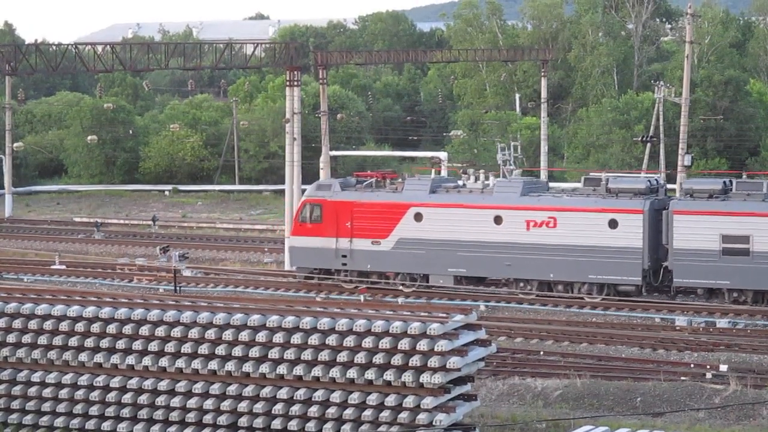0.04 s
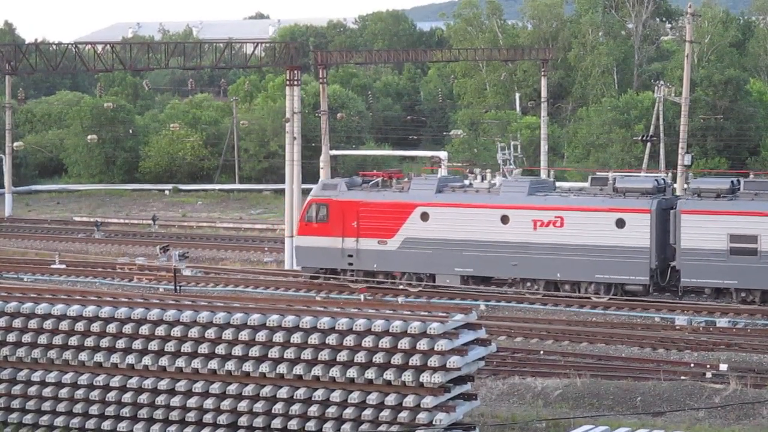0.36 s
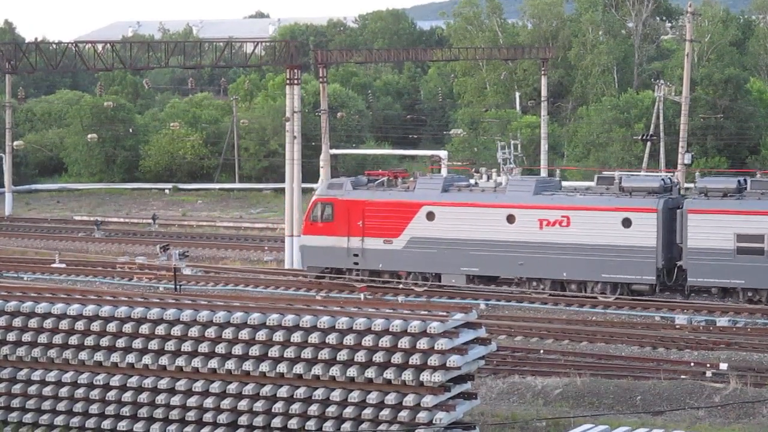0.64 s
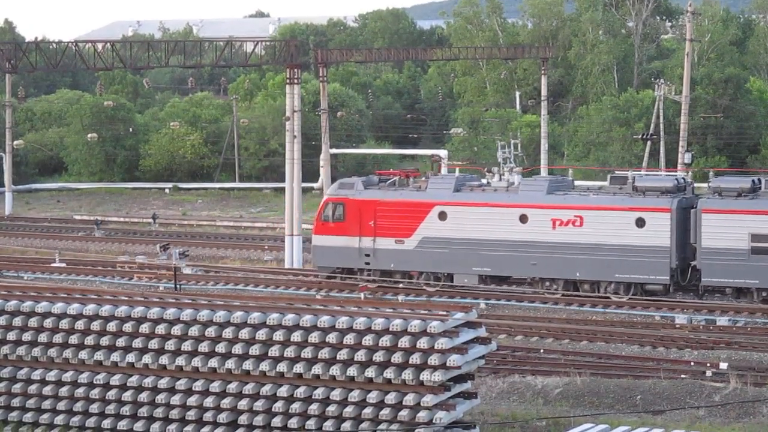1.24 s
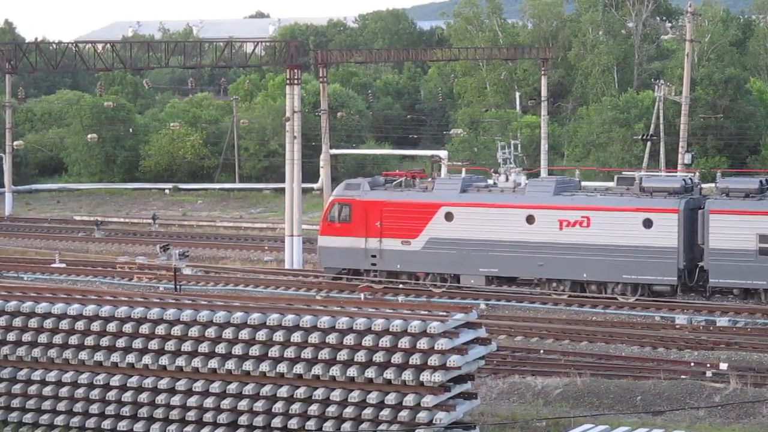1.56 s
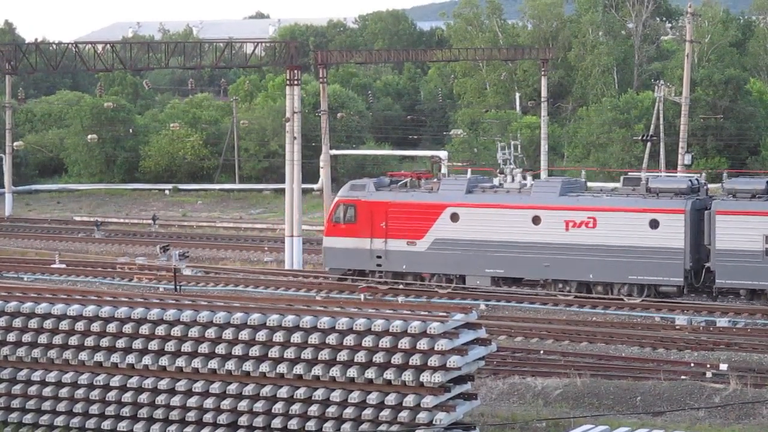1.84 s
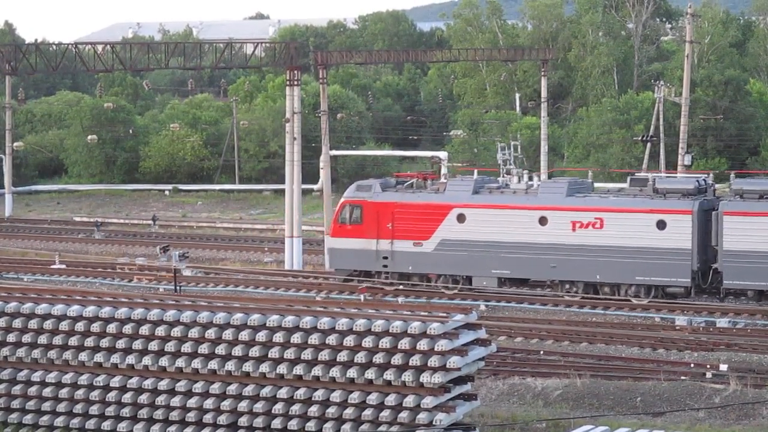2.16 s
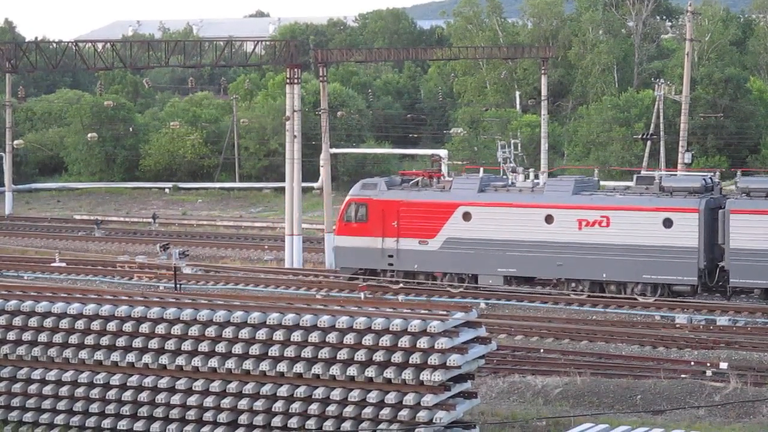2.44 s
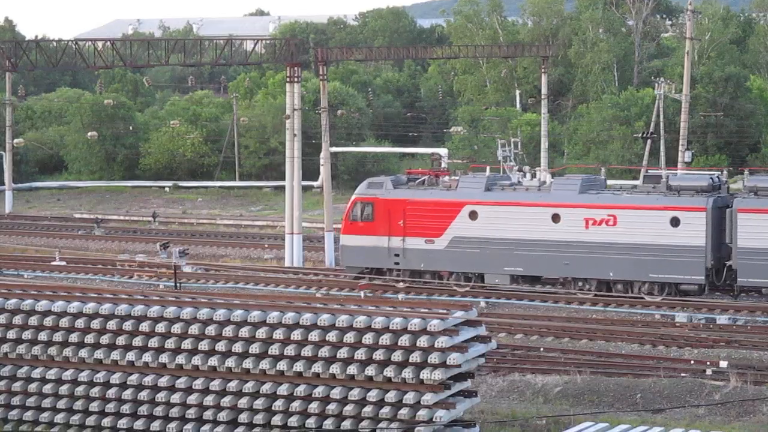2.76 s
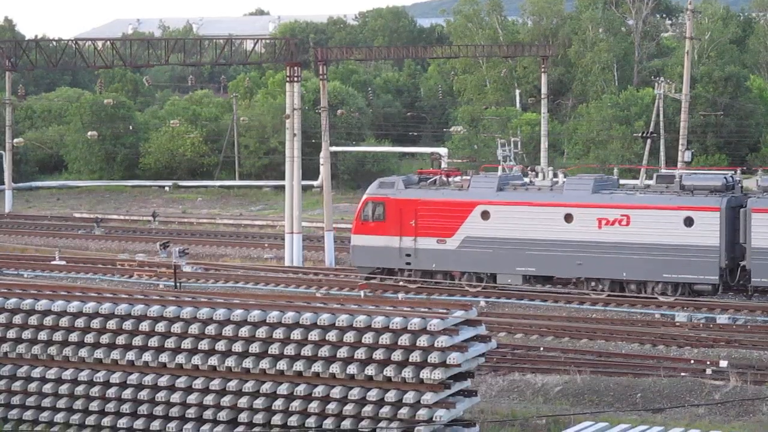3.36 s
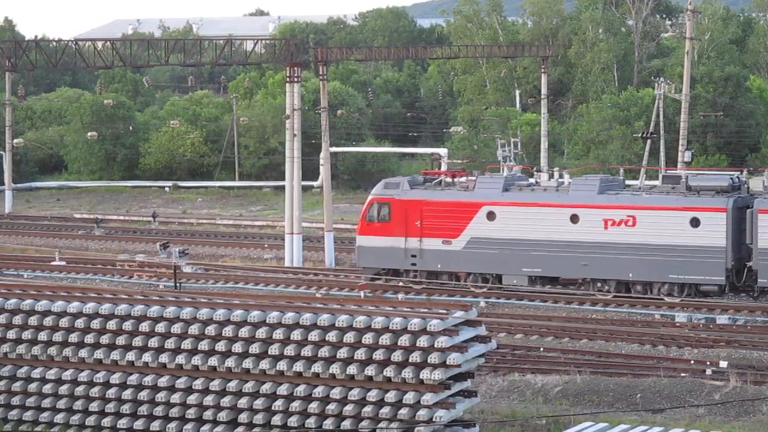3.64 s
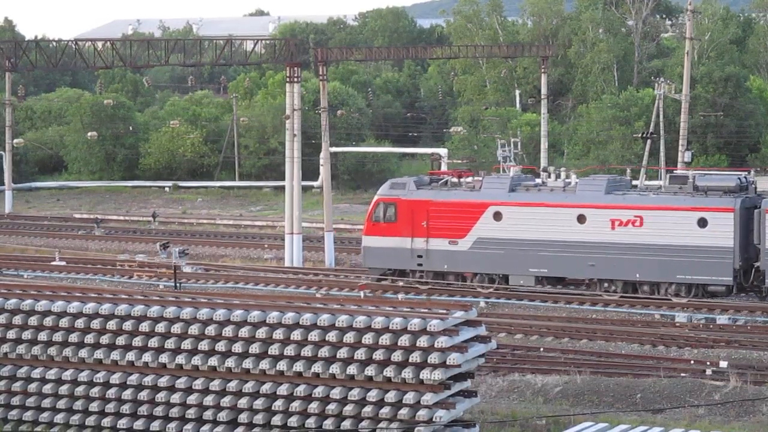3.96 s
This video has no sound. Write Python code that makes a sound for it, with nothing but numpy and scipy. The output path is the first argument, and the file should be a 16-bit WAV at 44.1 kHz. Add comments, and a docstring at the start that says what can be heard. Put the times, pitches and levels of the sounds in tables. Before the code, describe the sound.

An electric locomotive's cooling blowers whirr as it creeps through a rail yard, heard from some way off. One steady tone swells and fades over rushing air, a deep hum, faint motor whines and rumbling wheels.

```python
"""The cooling blowers of an electric locomotive creeping through a rail yard, some way off, in mono.
They sing one steady blade tone that swells and fades at the microphone as the engine moves.
Behind it the cooling air rushes and rings in the ducts, the body booms, and the motors add
a low hum and faint whines. The running gear rumbles underneath."""
import sys
import numpy as np
from scipy import signal
from scipy.fft import rfft, irfft
from scipy.io import wavfile
from scipy.ndimage import uniform_filter1d

SR = 44100
rng = np.random.default_rng(int(sys.argv[2]) if len(sys.argv) > 2 else 0)


def generate_wav(signal):
    """Clip the signal to [-1, 1] and save it as 16-bit WAV at the path in sys.argv[1]."""
    frames = np.transpose(np.atleast_2d(signal))
    scaled = np.clip(frames, -1, 1) * 32767
    pcm = np.round(scaled).astype(np.int16)
    wavfile.write(sys.argv[1], SR, pcm)


N = 176400
T = np.arange(N) / SR
HZ = np.maximum(np.arange(N // 2 + 1) * SR / N, 1)

# Rumble of the running gear: frequency_hz, density_db (per Hz)
RUMBLE_SPECTRUM = [(12, -81.5), (25, -65.5), (40, -59.5), (54, -49), (70, -48), (95, -47.5), (118, -57.5),
                   (200, -68.5), (500, -92.5)]
# Rush of the cooling air: frequency_hz, density_db (per Hz)
AIR_SPECTRUM = [(100, -61.5), (380, -56), (800, -54.5), (890, -57), (970, -55), (1130, -59.5),
                (1345, -57.5), (1510, -64.5), (2000, -64.5), (2650, -69), (3200, -71.3), (3750, -72.5),
                (4200, -74.5), (5400, -76.5), (6500, -81.5), (7200, -87.5), (8300, -90.5), (8900, -96.3),
                (11800, -101.5), (15500, -117)]
# The treble rises and falls, and steps down sharply at about 2.46 s: time_s, gain_db
TREBLE_GAIN = [(0, 1.5), (.32, 0.5), (.44, -1.2), (1, -0.2), (1.55, 2), (1.83, -1), (2.2, -.8), (2.44, .8),
               (2.48, -1.1), (2.9, 0), (3.27, 1), (3.5, 0.6), (4, 1.5)]
# Whines of motors and smaller fans: pitch_hz, start_level_db (rms), change_db_per_s
MOTOR_WHINES = [(78, -40, -1), (246, -39, 1.5), (500, -45, 2.5), (948, -41.5, -0.5), (1134, -50.5, 0.5),
                (1190, -51.5, 3), (1325, -44, -1.8), (1417, -57.5, 3.5), (1568, -58, 2)]
# Resonances of the air ducts: centre_hz, width_hz, level_db (rms)
DUCT_RESONANCES = [(156.5, 40, -30), (282, 60, -34), (489.2, 118, -26.5), (564.8, 68, -26), (700, 74, -31),
                   (751.7, 32, -36.5), (1645, 70, -48.5), (2394, 260, -46.5), (2895, 150, -51.5)]
# Deep boom of the body: time_s, level_db (rms)
BOOM_SWELLS = [(0, -23.5), (.18, -21.5), (.3, -23), (.7, -25), (.88, -22.5), (1.08, -24.5), (1.27, -18),
               (1.47, -17.5), (1.67, -22.5), (1.8, -17), (1.9, -21), (2.1, -21), (2.34, -25.5),
               (2.44, -17.5), (2.58, -22), (2.9, -17), (3.05, -19), (3.35, -18.5), (3.5, -22), (3.7, -21.5),
               (3.84, -17), (4, -19.5)]
# Blade tone at the microphone: time_s, level_db (rms)
BLADE_SWELLS = [(0, -17), (.3, -12.5), (.57, -17), (.8, -14.5), (.93, -15.5), (1.08, -19.5), (1.16, -32),
                (1.27, -35), (1.47, -19), (1.6, -18.5), (1.7, -21), (1.92, -16), (2.45, -16), (2.7, -19),
                (3.07, -20), (3.25, -27), (3.46, -22), (3.73, -20), (4, -25.5)]


def from_db(db):
    """Decibels to gain."""
    return 10 ** (np.asarray(db) / 20)


def rms_one(x):
    """Scale to an rms of one."""
    return x / np.sqrt(np.mean(x ** 2) + 1e-20)


def in_time(rows):
    """Join (time_s, value) rows by straight lines."""
    return np.interp(T, *np.transpose(rows))


def drift(rate_hz):
    """Random wander, mostly slower than `rate_hz`; rms one."""
    spectrum = rfft(rng.standard_normal(N)) / (1 + (np.fft.rfftfreq(N, 1 / SR) / rate_hz) ** 2)
    spectrum[0] = 0
    return rms_one(irfft(spectrum, N))


def noise_spectrum(points):
    """Spectrum of a noise that follows (frequency_hz, density_db) points."""
    hz, db = np.transpose(points)
    density_db = np.interp(np.log(HZ), np.log(hz), db, right=-np.inf)
    return rfft(rng.standard_normal(N)) * np.sqrt(SR / 2) * from_db(density_db)


def resonant_noise(centre_hz, width_hz):
    """Turbulence through a resonance applied twice; rms one."""
    detune = (HZ ** 2 - centre_hz ** 2) / (HZ * width_hz)
    return rms_one(irfft(rfft(rng.standard_normal(N)) / (1 + 1j * detune) ** 2, N))


def steadied(x, window_s):
    """Even out swells slower than `window_s`, keeping the fast grain; rms one."""
    size = int(window_s * SR)
    power = uniform_filter1d(uniform_filter1d(x ** 2, size), size)
    return rms_one(x / np.sqrt(power + 1e-12))


def rotor_tone(pitch_hz, wander_hz):
    """Sine tone of a rotor whose speed wanders a little; rms one."""
    cycles = np.cumsum(pitch_hz + wander_hz * drift(rate_hz=2.42)) / SR + rng.random()
    return np.sqrt(2) * np.sin(2 * np.pi * cycles)


def running_gear():
    """Slowly rolling wheels lay a low rumble under everything."""
    return irfft(noise_spectrum(RUMBLE_SPECTRUM), N)


def motor_whines():
    """Faint motor and fan tones waver, and come forward or recede as the engine moves."""
    out = 0
    for pitch_hz, start_level_db, change_db_per_s in MOTOR_WHINES:
        level = from_db(start_level_db + change_db_per_s * T)
        waver = rms_one(from_db(3 * drift(rate_hz=6.3)))
        out += level * waver * rotor_tone(pitch_hz, wander_hz=1.07)
    return out


def air_rush(treble_from_hz=1300):
    """Broad rush of cooling air; each octave shimmers slightly, and the treble rises and falls."""
    spectrum, out = noise_spectrum(AIR_SPECTRUM), 0
    octaves = np.arange(7, 15)   # bands centred on 2 ** octave Hz
    for octave in octaves:
        band_share = np.interp(np.log2(HZ), octaves, octaves == octave)
        treble_share = 1 / (1 + (treble_from_hz / 2 ** octave) ** 2)
        shimmer_db = treble_share * in_time(TREBLE_GAIN) + 0.5 * drift(rate_hz=4.9)
        out += irfft(spectrum * band_share, N) * from_db(shimmer_db)
    return out


def ducts():
    """The airflow excites the resonances of the ducts."""
    return sum(from_db(level_db) * resonant_noise(centre_hz, width_hz)
               for centre_hz, width_hz, level_db in DUCT_RESONANCES)


def body_drone():
    """The deep resonance of the body and the motor hum within it swell and sink together."""
    boom = steadied(resonant_noise(centre_hz=193.5, width_hz=86), window_s=0.1)
    hum = from_db(-7) * rotor_tone(pitch_hz=199, wander_hz=0.7)
    return from_db(in_time(BOOM_SWELLS)) * (boom + hum)


def blower_tone():
    """Passing blades sing a nearly pure tone that swells and fades as the engine moves."""
    flutter_db = 0.33 * drift(rate_hz=10)
    level = from_db(in_time(BLADE_SWELLS) + flutter_db)
    return level * rotor_tone(pitch_hz=595.7, wander_hz=0.28)


def scene():
    """The whole locomotive from across the yard, in one channel."""
    return (blower_tone() + motor_whines() + air_rush() + ducts() + body_drone() + running_gear())[None]


def record(dry, stopband_hz=16300):
    """The microphone channel, with the very top cut steeply."""
    return signal.sosfilt(signal.cheby2(14, 50, stopband_hz, fs=SR, output="sos"), dry)


dry = scene()
out = record(dry)
generate_wav(out)
```